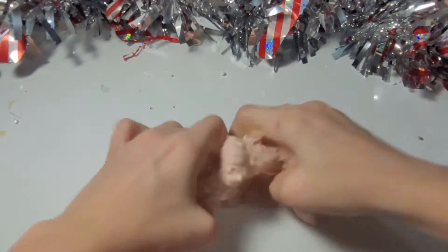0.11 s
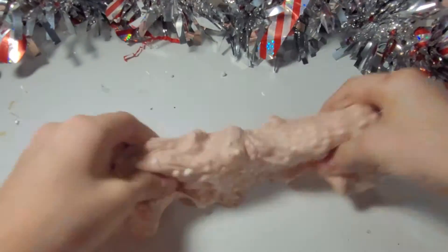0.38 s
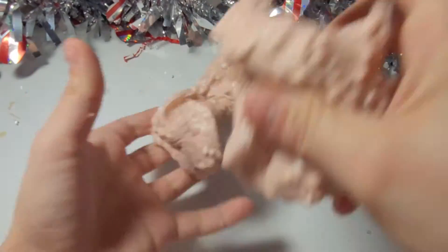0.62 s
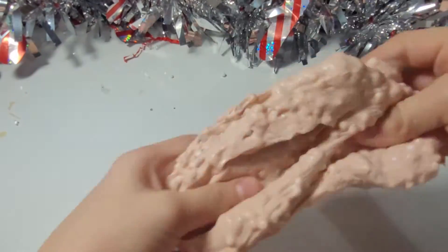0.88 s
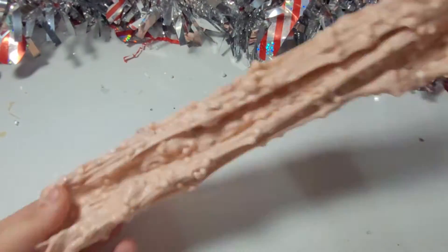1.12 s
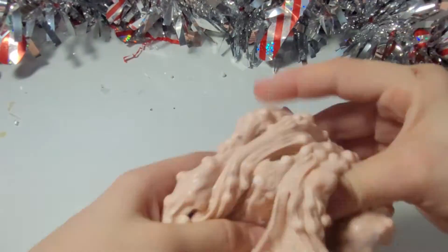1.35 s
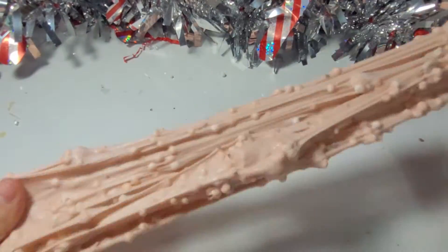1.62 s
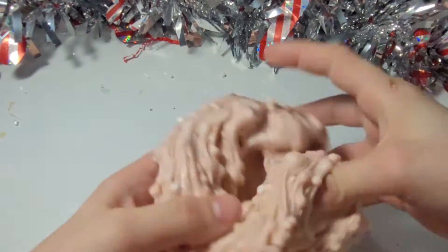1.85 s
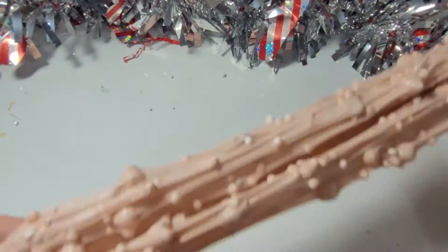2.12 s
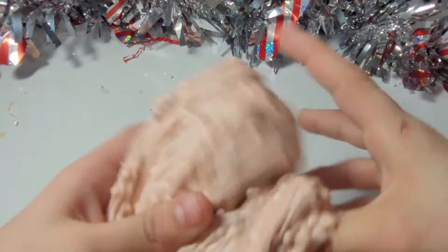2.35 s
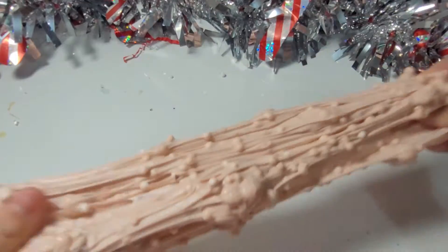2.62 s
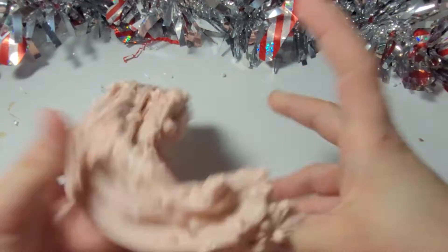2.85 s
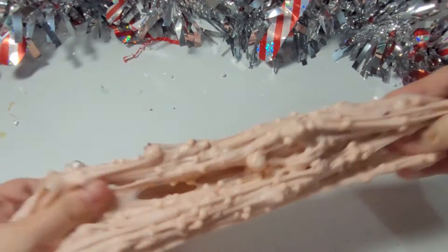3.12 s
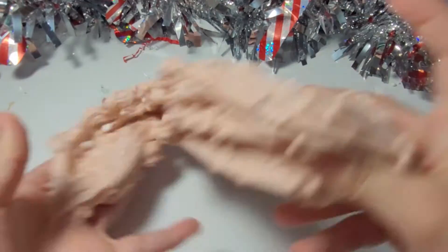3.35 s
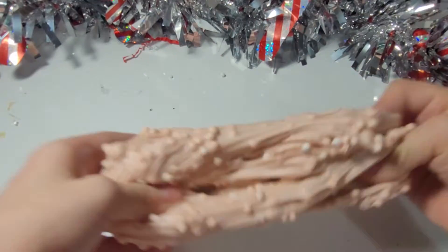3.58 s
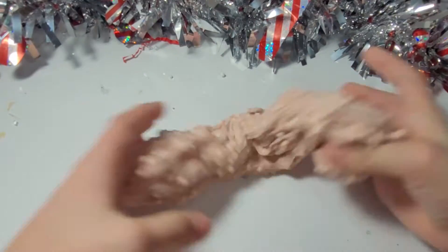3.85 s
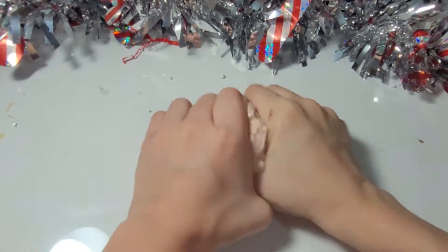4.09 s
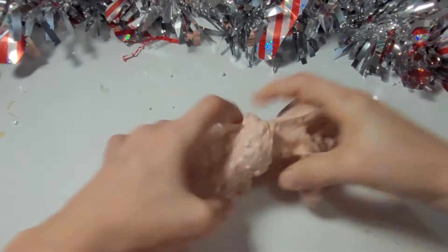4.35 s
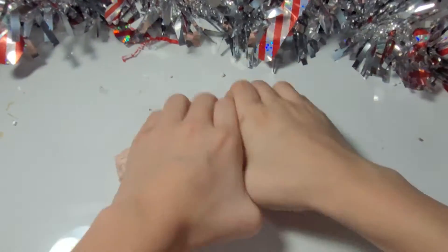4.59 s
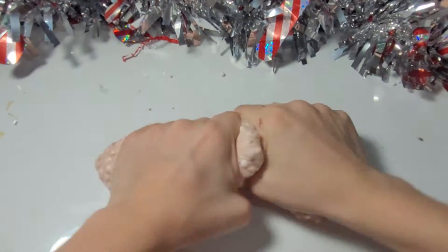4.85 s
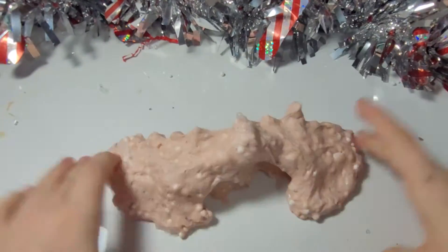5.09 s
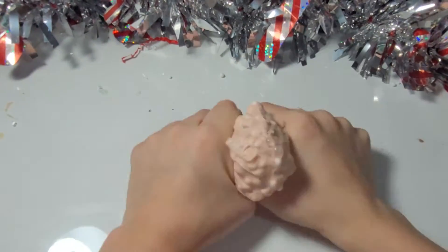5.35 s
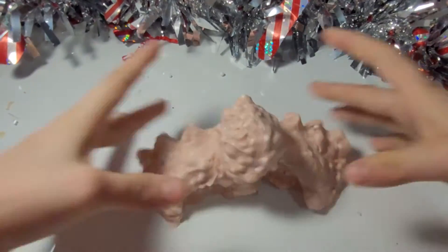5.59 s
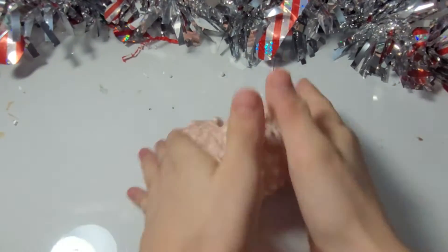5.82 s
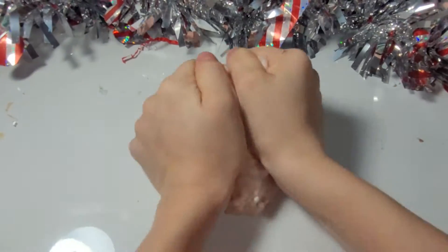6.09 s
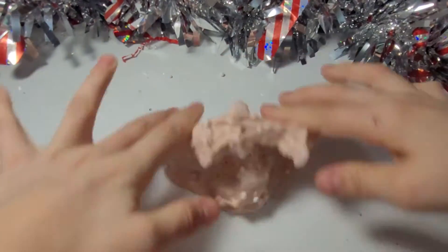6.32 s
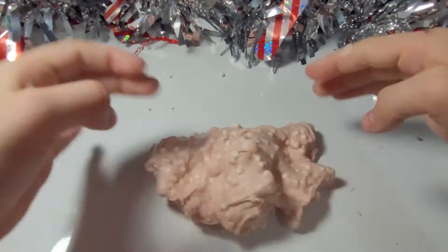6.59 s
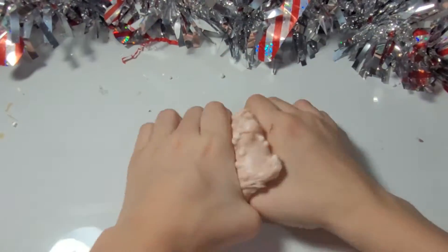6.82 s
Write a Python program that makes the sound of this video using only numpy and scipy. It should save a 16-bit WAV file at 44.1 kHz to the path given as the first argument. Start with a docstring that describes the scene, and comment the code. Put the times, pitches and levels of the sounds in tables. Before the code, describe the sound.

Close stereo sound of sticky, beady slime being kneaded indoors. Light crackling and dull handling bumps lead into several seconds of faint, fine crackle as it is pulled and folded. Then hard squeezes release dense, loud snapping pops and wet crunches, separated by short softer gaps with low thumps and rubbing on the tabletop. Faint low room rumble lies underneath.

```python
"""Bead-filled slime is kneaded, stretched and squeezed by two hands on a table top, close to a stereo
microphone. Beads slipping and trapped air bursting make a dense crackle of tiny ringing grains and fizz,
and pops of snap and noise spray stand out of it, answered by a small room. Fingers and slime land as soft
dents and rub as lumpy noise; both ring dull table modes, while the stand sways low. Room rumble lies below."""
import sys
import numpy as np
from scipy import signal
from scipy.fft import rfft, irfft, next_fast_len
from scipy.io import wavfile

SR = 44100
rng = np.random.default_rng(int(sys.argv[2]) if len(sys.argv) > 2 else 0)


def gain_from_db(level_db):
    """Convert decibel levels to linear amplitude factors (20 dB per decade)."""
    decades = np.asarray(level_db, float) / 20
    return 10 ** decades


def master(y):
    """Save y as 16-bit WAV."""
    cut = np.clip(np.atleast_2d(y).T, -1, 1)
    pcm = np.round(cut * 32767)  # scale
    wavfile.write(sys.argv[1], SR, pcm.astype(np.int16))


N = 306495


def rms_one(x):
    """Scale to unit rms."""
    return x / np.sqrt(np.mean(x ** 2) + 1e-20)


def sides(pan_db):
    """Left and right gain for a left-right difference in dB; positive leans left."""
    return gain_from_db(np.array([pan_db / 2, -pan_db / 2]))


def drift(rate):
    """Slow random wander of spread 1: noise through a double one-pole low-pass, at a 40th of the rate."""
    r = np.exp(-80 * np.pi * rate / SR)
    noise = rng.standard_normal(N // 40 + 2002)
    slow = signal.lfilter([1], [1, -2 * r, r * r], noise)[2000:]
    return np.interp(np.arange(N) / 40, np.arange(len(slow)), rms_one(slow))


def ring(clicks, hz, t60):
    """Resonator: a unit click sets off a sine of height 1 that loses 60 dB in t60 seconds."""
    r, w = gain_from_db(-60 / (t60 * SR)), 2 * np.pi * hz / SR
    return signal.lfilter([0, np.sin(w)], [1, -2 * r * np.cos(w), r * r], clicks + 1e-18)


def colour(x, spectrum):
    """Shape a sound by a spectrum drawn on a log-frequency axis."""
    hz, db = np.transpose(spectrum)
    size = next_fast_len(N)
    bins_hz = np.linspace(1, SR / 2, size // 2 + 1)
    gain = gain_from_db(np.interp(np.log(bins_hz), np.log(hz), db))
    return irfft(rfft(x, size) * gain, size)[..., :N]


def cut(x, hz, kind):
    """Second-order low- or high-pass."""
    return signal.sosfilt(signal.butter(2, hz, kind, fs=SR, output="sos"), x)


def swells(s, rise, fall, peak_db, steepness=1):
    """Gain over time of overlapping swells, added in power."""
    drop_db, rounding = 21, 1.4   # loss one rise or fall time from the peak; 1 pointed, 2 rounded
    t = np.arange(0, N + 40, 40) / SR
    off = t - s[:, None]
    span = np.where(off < 0, rise[:, None], fall[:, None])
    reach = np.abs(off) / np.maximum(span, .003)
    level_db = peak_db[:, None] - steepness * drop_db * reach ** rounding
    power = gain_from_db(2 * level_db).sum(axis=0)
    return np.interp(np.arange(N) / SR, t, np.sqrt(power) + 1e-7)


def kneading():
    """Gains of the bright crackle and of its wet low part: each pull, fold or squeeze is one swell."""
    # Each row: peak time in seconds, rise in seconds, fall in seconds, relative peak level in dB,
    # wet low part against that level in dB
    strokes = [(0.0, .1, 0.11, -30, -9.5), (0.12, 0.058, 0.085, -51, -5), (0.198, 0.22, 0.068, -39.5, -3.5),
               (0.411, 0.091, 0.14, -39.5, -6), (0.48, 0.086, 0.061, -51, -1),
               (0.57, 0.05, 0.045, -53, -8.5), (0.692, 0.088, 0.14, -56, -5.5),
               (0.91, 0.039, 0.044, -50, -6.5), (1.02, .17, 0.15, -45.5, -8.5),
               (1.22, 0.091, .12, -56.5, -6), (1.52, 0.19, 0.35, -47, -5.5), (1.658, .015, 0.15, -41, -3),
               (1.848, 0.012, 0.025, -47, 2), (2.081, 0.2, 0.11, -45, -5.5), (2.25, 0.085, 0.23, -58, -6.5),
               (2.66, 0.25, .13, -43, -9), (2.84, 0.15, 0.07, -51.5, -6.5), (3.13, 0.23, 0.26, -44, -6),
               (3.39, 0.16, 0.049, -51, -5.5), (3.47, 0.012, 0.034, -60, 1), (3.66, 0.19, 0.18, -47.5, -7),
               (3.899, 0.11, 0.043, -49.5, -9), (4.041, .06, 0.12, -42, -2.5), (4.097, .03, 0.074, -21, -3),
               (4.189, 0.037, .13, -27.5, 1.5), (4.409, 0.12, 0.071, -35, -3), (4.63, 0.014, 0.056, -57, 4),
               (4.679, 0.024, 0.17, -45, 9.5), (4.768, 0.11, .11, -23, -8), (4.978, 0.17, 0.081, -38, -3.5),
               (5.262, 0.037, 0.25, -40, -5.5), (5.43, 0.18, 0.1, -27.5, -7.5),
               (5.598, 0.099, 0.069, -34.5, -3.5), (5.842, 0.017, 0.24, -42.5, -6),
               (6.029, 0.1, 0.18, -34.5, -3.5), (6.14, 0.061, 0.083, -36.5, -6),
               (6.28, 0.18, 0.085, -37, -7), (6.432, 0.011, .07, -37.5, -7),
               (6.578, 0.11, 0.057, -41.5, -7), (6.799, 0.028, 0.15, -40, -9), (6.9, 0.05, .11, -34, -6.5),
               (6.95, 0.052, 0.12, -19.5, -7)]
    s, rise, fall, peak_db, wet_db = np.transpose(strokes)
    wet_steepness = 1.13   # the wet low part swells and dies more steeply
    return swells(s, rise, fall, peak_db), swells(s, rise, fall, peak_db + wet_db, wet_steepness)


def crackle():
    """Clumped tiny bursts, each ringing a few cycles at its own pitch and place, over a wet fizz."""
    # Overall colour of grains and fizz. Each row: frequency in Hz, level in dB
    crackle_colour = [(600, 6.5), (1000, 3), (2400, 14.5), (5000, 5.5), (9000, -4.5), (12500, 0),
                      (15800, -1), (16300, -31)]
    grains_per_s = 1500   # where the clumping is neutral
    bright_gain, low_gain = kneading()
    sizes = gain_from_db(3.0 * np.minimum(rng.exponential(1, N), 4)) * rng.choice([-1, 1], N)
    clumps = drift(50)   # tears run on for a few milliseconds
    born = rng.random(N) < grains_per_s * gain_from_db(7.0 * clumps) / SR
    places = sides(1.9 * rng.standard_normal(N))
    pitches = np.geomspace(900, 15500, 14)   # Hz
    dealt = rng.integers(0, 14, N)
    grains = 0
    for k, hz in enumerate(pitches):
        clicks = sizes * born * (dealt == k) * places
        clicks[1] = np.roll(clicks[1], rng.integers(-8, 9))   # each pitch has its own lag between ports
        grains = grains + ring(clicks, hz, 6 / hz) * hz
    fizz = rng.standard_normal((2, N)) * gain_from_db(2.6 * clumps + 2.1 * drift(27.5))
    mixed = rms_one(grains) + gain_from_db(8.5) * rms_one(cut(fizz, 3000, "high"))
    both = colour(mixed, crackle_colour)
    low, high = cut(both, 3300, "low"), cut(both, 2600, "high")
    bright = bright_gain * gain_from_db(1.5) * rms_one(high) * sides(1.4)[:, None]
    return bright + low_gain * gain_from_db(6.0) * rms_one(low)


def scattered_pops():
    """Scattered pops just above the crackle, at random moments and pitches, following the kneading."""
    count, low_hz, high_hz = 170, 2500, 13000
    over_db, spread_db = 5.5, 2.5   # least level above the crackle gain, and the random excess on top
    when, pitch, size = rng.random((count, 3)).T
    crackle_db = 20 * np.log10(kneading()[0][(when * (N - 1)).astype(int)])
    peak_db = crackle_db + over_db - spread_db * np.log(1 - .95 * size)
    return list(zip(when * N / SR, peak_db, low_hz * (high_hz / low_hz) ** pitch))


def pops():
    """A pocket bursts: a snap, then a spray of smaller tears dying in milliseconds, wide around its centre."""
    # Pops that stand out clearly from the crackle.
    # Each row: time in seconds, nominal peak level in dB, centre frequency in Hz
    clear_pops = [(0.0498, -26.5, 11700), (0.0943, -25.5, 9900), (0.1922, -26.5, 3130), (0.3752, -33, 9000),
                  (0.3956, -31.0, 1700), (0.458, -29.5, 7440), (0.4853, -34.5, 12000), (0.5732, -39, 11500),
                  (0.692, -41, 8300), (0.8432, -38.5, 8600), (0.9735, -25, 12300), (1.0268, -38, 9400),
                  (1.3221, -37.5, 2600), (1.4275, -37.5, 8800), (1.505, -25.5, 11700),
                  (1.5192, -31.5, 10300), (1.6112, -34, 9300), (1.6343, -34, 9900), (1.654, -24, 4660),
                  (1.6902, -28, 4930), (1.848, -30.5, 3080), (1.9764, -48, 6500), (2.054, -42, 3750),
                  (2.118, -32.5, 8300), (2.306, -43, 3320), (2.3377, -41, 3630), (2.363, -35, 4700),
                  (2.421, -35.5, 4170), (2.4665, -35.5, 3100), (2.6107, -32, 8300), (2.6593, -27, 11600.0),
                  (2.92, -45, 6130.0), (2.9962, -45, 9460), (3.0487, -39, 6960), (3.0815, -31.5, 11100.0),
                  (3.1094, -35, 8200), (3.1334, -23.5, 9400), (3.2082, -36.5, 5450), (3.3468, -42.5, 7660),
                  (3.4701, -45.5, 4120), (3.5624, -39.5, 8000), (3.6652, -35, 5650), (3.8491, -40.5, 6800),
                  (3.8973, -38, 4800), (3.9574, -42, 8870), (4.0101, -46, 2450), (4.0324, -34, 2080),
                  (4.064, -28, 9400), (4.0926, -9, 2700), (4.1406, -13, 7540), (4.1503, -20.5, 9000),
                  (4.1653, -12.5, 11000), (4.1724, -10, 4900), (4.1813, -11, 3990), (4.1902, -10.5, 4720),
                  (4.233, -9, 7840), (4.2415, -14, 2800), (4.2968, -17, 10600), (4.337, -17.5, 2500),
                  (4.3721, -28.5, 2630), (4.6243, -35, 1326), (4.6668, -13, 10660), (4.6765, -19, 3490),
                  (4.7074, -18, 3730), (4.733, -22.5, 1610), (4.7413, -6.5, 3480), (4.7546, -17, 6170),
                  (4.774, -11.5, 8600), (4.7863, -12, 7300), (4.7953, -11, 7290), (4.8047, -9.5, 8000),
                  (4.8172, -24, 8460), (4.8895, -32, 9300), (5.1534, -42.5, 4400), (5.204, -35, 10400),
                  (5.3016, -23.5, 4130), (5.3445, -11, 4200), (5.3535, -15, 11200), (5.4114, -18.5, 7900),
                  (5.4352, -16, 7260), (5.4416, -12.5, 4140), (5.8106, -44.5, 8000), (5.8403, -29.5, 5140),
                  (5.9242, -33, 5700), (5.978, -38.5, 9700), (5.9958, -19, 9100), (6.022, -9, 11660),
                  (6.0711, -17, 11600), (6.0858, -11, 3100), (6.132, -22.5, 10800), (6.154, -25, 5860),
                  (6.1865, -16, 12370), (6.421, -50.5, 6900), (6.4315, -19, 9050), (6.5557, -27.5, 9800),
                  (6.7737, -32, 2670), (6.795, -30, 5330), (6.8335, -17, 8000), (6.856, -28, 6300),
                  (6.8889, -17.5, 4900), (6.9285, -15.5, 8940)]
    snap_db = -4
    out, t = np.zeros((2, N + 2000)), np.arange(1500) / SR
    decay = gain_from_db(-60 * t / 0.03) + gain_from_db(-35.0 - 60 * t / 0.065)   # a quick fall and a faint longer tail
    envelope = (1 - np.exp(-(t / 0.00036) ** 2)) * decay
    rows = clear_pops + scattered_pops()
    places_db = rng.normal(2.2, 2.7, len(rows))
    for (s, peak_db, hz), pan_db in zip(rows, places_db):
        tears = gain_from_db(6.7 * np.minimum(rng.standard_normal(1500), 2))
        spray = rng.standard_normal((3, 1500)) * tears
        spray = rms_one(spray[:2] + 0.39 * spray[2]) * envelope   # partly shared by both ports
        spray[:, 44:47] += gain_from_db(snap_db) * np.array([8, -3, -4])   # the snap, one sharp swing
        edges = [hz / 1.91, min(hz * 1.61, .45 * SR)]
        centred = signal.sosfilt(signal.butter(2, edges, "band", fs=SR, output="sos"), spray)
        pop = centred + gain_from_db(-6) * cut(spray, 1800, "high")
        # the opened pocket rings briefly an octave lower
        pop = pop + gain_from_db(-15) * ring(spray, .5 * hz, .005)
        early_rms = np.sqrt(np.mean(pop[:, 20:120] ** 2))
        pop = pop / early_rms * gain_from_db(peak_db - 5.5) * sides(pan_db)[:, None]
        at = max(round(s * SR) - 24, 0)   # the tear starts just before the snap
        lag = int(np.clip(round(-pan_db), -8, 8))   # samples; the nearer port hears it first
        out[0, at + 8 + lag:at + 1508 + lag] += pop[0]
        out[1, at + 8:at + 1508] += pop[1]
    return out[:, 8:N + 8]


def room(x):
    """Eight feedback delays a side, duller on every round."""
    t60_s, wall_cut_hz = .22, 26000
    size = next_fast_len(N + SR // 2)
    w = np.linspace(0, np.pi, size // 2 + 1)
    dull = 1 / (1 + 1j * w * SR / (2 * np.pi * wall_cut_hz))
    out = np.zeros((2, len(w)), complex)
    lags = (rng.uniform(.004, 0.033, 16) * SR).astype(int)
    for k, lag in enumerate(lags):
        loop = gain_from_db(-60 * lag / SR / t60_s) * dull * np.exp(-1j * w * lag)
        out[k % 2] += loop / (1 - loop) * (-1) ** (k // 2)
    return irfft(out * rfft(x.mean(axis=0), size), size)[:, :N]


def table_ring(push):
    """The table top as a bank of dull modes, most of them carried more to the right port."""
    # Each row: frequency in Hz, relative level in dB, time to fall 60 dB in seconds, left-right in dB
    modes = [(144, -3.5, 0.15, -3.5), (254.2, 0.5, 0.12, -0.5), (378, -3.5, 0.037, -14.5),
             (462.7, -2.5, 0.072, -8), (660, -1, 0.022, -10), (850, -0.5, 0.014, -9),
             (1168, -32.5, 0.074, 17)]
    rung = 0
    for hz, level_db, t60, pan_db in modes:
        rung = rung + gain_from_db(level_db) * ring(push, hz, t60) * sides(pan_db)[:, None]
    return rung


def landings():
    """Fingers and slime land: a soft dent and a wet squelch, heard directly and through the table modes."""
    # Each row: start in seconds, nominal peak level in dB, contact frequency in Hz, left-right in dB
    thuds = [(0.1856, -27.5, 454, -8.5), (0.2035, -38, 393, -10), (0.3368, -26.5, 315, -12),
             (0.3435, -34.5, 294, -12), (0.3939, -24, 574, -26), (0.457, -31.5, 466, -10),
             (1.2218, -50, 920, 22), (1.6527, -24, 366.0, 3), (1.6938, -33.5, 346, 15),
             (1.7161, -22, 410, -5), (1.8496, -39.5, 415, 2), (1.861, -39, 1040, 8),
             (2.3623, -41.5, 450, 6), (3.3508, -42.5, 300, -6), (3.8921, -28.5, 464.3, -11.5),
             (4.032, -26, 377, -12), (4.0972, -19.5, 320, -6), (4.1809, -37, 630, -2),
             (4.2423, -54, 623, 1), (4.4184, -24.5, 528, -8), (4.6123, -15.5, 314, 2.5),
             (4.6235, -11, 446, -15.5), (4.629, -14, 375, -9.5), (4.7325, -7.5, 607, -2),
             (4.8128, -17.5, 685, 0), (4.968, -32, 420, -13.5), (5.2598, -26, 363, -5),
             (5.348, -29.5, 516, -11), (5.441, -25, 520, -1), (5.6116, -23.5, 660.0, -10.5),
             (5.7372, -35, 372, -5), (5.8408, -42.5, 368, -11.5), (6.0238, -32.5, 420, -5),
             (6.0939, -31, 454, -9.5), (6.1519, -25, 660, -8), (6.4309, -27.5, 577, -6.5),
             (6.5465, -41, 415, -27), (6.5722, -32.5, 284, -2), (6.7719, -21.5, 547, -12),
             (6.782, -19, 288, 0), (6.7901, -20.5, 490, -11.5), (6.8048, -12.5, 410, -10),
             (6.8206, -29, 363, -9)]
    left_lag_s = 0.00067   # the dent reaches the left port later through the stand
    contact, t = np.zeros((2, N + 1800)), np.arange(1800) / SR
    for s, peak_db, hz, pan_db in thuds:
        turns = hz * (t - [[left_lag_s], [0]])
        swing = np.sin(2 * np.pi * turns) + 0.66 * np.sin(3.6 * np.pi * turns)
        dent = swing * np.exp(-((turns - .9) / 0.69) ** 2)   # one or two swings
        squelch = cut(cut(rng.standard_normal((2, 1800)), 2.0 * hz, "low"), 1.3 * hz, "high")
        # wet slime spreading after the touch
        spreading = gain_from_db(-17.5 - 60 * t / 0.078) * (1 - np.exp(-t * hz)) * rms_one(squelch)
        at = round(s * SR)
        contact[:, at:at + 1800] += gain_from_db(peak_db) * (dent + spreading) * sides(pan_db)[:, None]
    contact = contact[:, :N]
    blow = contact + .5 * contact[::-1]
    return contact + gain_from_db(-45.5) * table_ring(blow)


def pressing():
    """Rubbing and sway gains: each time hands or slime bear down on the table is one swell."""
    # Each row: peak time in seconds, rise in seconds, fall in seconds, rubbing level in dB, sway level in dB
    presses = [(0.0, .1, 0.11, -52, -48), (0.208, 0.089, 0.069, -38, -40), (0.37, 0.042, 0.15, -35.5, -30),
               (0.478, 0.12, 0.049, -42, -43), (1.0, 0.05, 0.054, -86, -50.5),
               (1.53, 0.12, 0.064, -77, -60), (1.708, 0.049, 0.079, -32.5, -37.5),
               (1.86, 0.044, 0.12, -54, -63), (2.1, .25, 0.044, -86, -64), (2.43, 0.12, 0.23, -60.5, -67),
               (3.15, 0.2, 0.2, -63, -80), (3.929, 0.093, 0.027, -47, -44.5), (4.04, 0.032, 0.16, -38, -50),
               (4.418, 0.067, 0.077, -37.5, -42), (4.649, 0.044, 0.11, -38, -33),
               (4.999, 0.12, 0.035, -36.5, -50), (5.16, 0.016, 0.041, -52.5, -52),
               (5.3, 0.21, 0.089, -43, -44), (5.628, 0.12, 0.073, -38.5, -49),
               (5.744, 0.034, 0.084, -56.5, -43.5), (5.84, 0.036, 0.21, -49.5, -56),
               (6.08, .15, 0.088, -52, -68), (6.271, 0.071, 0.097, -40.5, -47.5),
               (6.59, 0.086, 0.067, -43.5, -38), (6.788, 0.023, .11, -26, -34)]
    s, rise, fall, rub_db, sway_db = np.transpose(presses)
    return swells(s, rise, fall, rub_db), swells(s, rise, fall, sway_db)


def rubbing():
    """Lumpy friction noise rings the table modes, and wet slime squishes under each press."""
    # working the slime always reaches the table a little
    gain = pressing()[0] + gain_from_db(-15.5) * kneading()[1]
    lumps = rng.standard_normal((2, N)) * gain_from_db(3.7 * drift(39))
    lumps = lumps + 0.34 * lumps[::-1]
    rubbed = rms_one(cut(table_ring(lumps), 160, "high"))
    squish = rms_one(cut(cut(lumps, 510, "high"), 1200, "low"))
    return gain * (rubbed + gain_from_db(-13) * squish)


def sway():
    """The stand sways as one low resonance driven by noise; it never quite rests."""
    sway_hz, t60_s = 62.4, 0.16
    idle_db, wander_db = -70, 2.5
    gain = pressing()[1] + gain_from_db(idle_db + wander_db * drift(6.0))
    push = rng.standard_normal((3, N))
    swaying = ring(push[0] + .3 * push[1:], sway_hz, t60_s)
    return gain * rms_one(cut(swaying, 45, "high"))


def rumble():
    """Low room rumble, partly shared by both ports, with faint microphone hiss: coloured white noise."""
    # Each row: frequency in Hz, relative level in dB
    rumble_colour = [(25, -42), (64, -28.5), (110, 5), (300, -2.5), (430, 2.5), (620, -14.5), (1500, -23),
                     (4000, -31.5), (16000, -47)]
    white = rng.standard_normal((3, N))
    return gain_from_db(-63) * rms_one(colour(white[0] + 0.8 * white[1:], rumble_colour))


def scene():
    """Slime, table and room; only the pops feed the room echo."""
    bursts = pops()
    slime = crackle() + bursts + gain_from_db(-14.5) * room(bursts)
    return slime + landings() + rubbing() + sway() + rumble()


def band_limit(x):
    """A steep low-pass at the top of the band."""
    return signal.sosfilt(signal.butter(12, 16990, fs=SR, output="sos"), x)


def record(dry):
    """The top is cut steeply, 50 dB down from 16.5 kHz, and peaks clip at full scale."""
    low_pass = signal.cheby2(10, 50, 16500, fs=SR, output="sos")
    finished = np.clip(signal.sosfilt(low_pass, dry), -1, 1)
    return band_limit(finished)


dry = scene()
out = record(dry)
master(out)
```